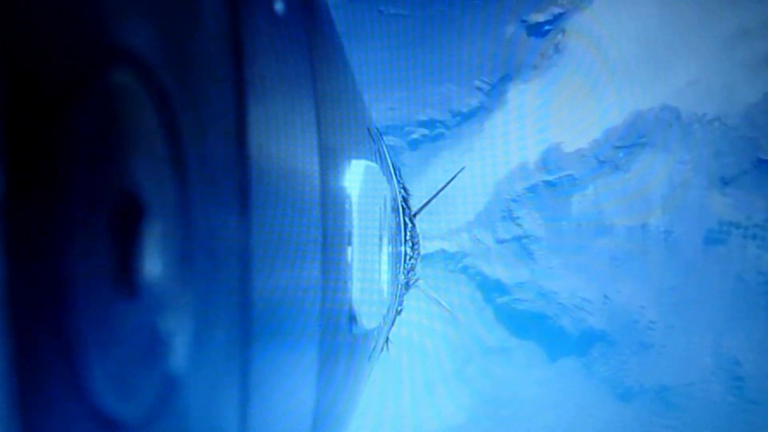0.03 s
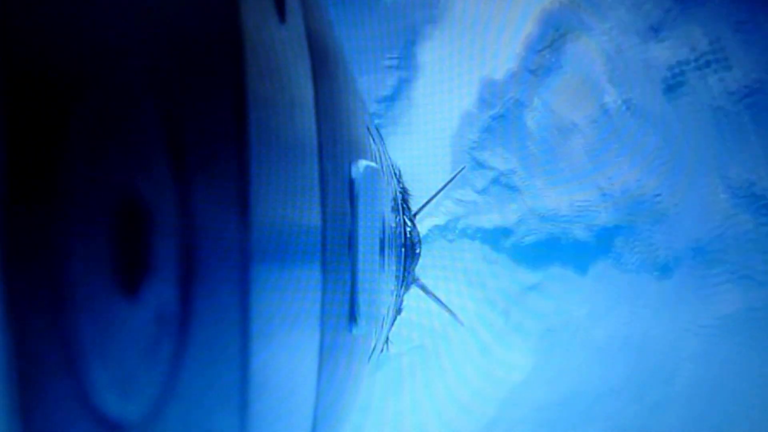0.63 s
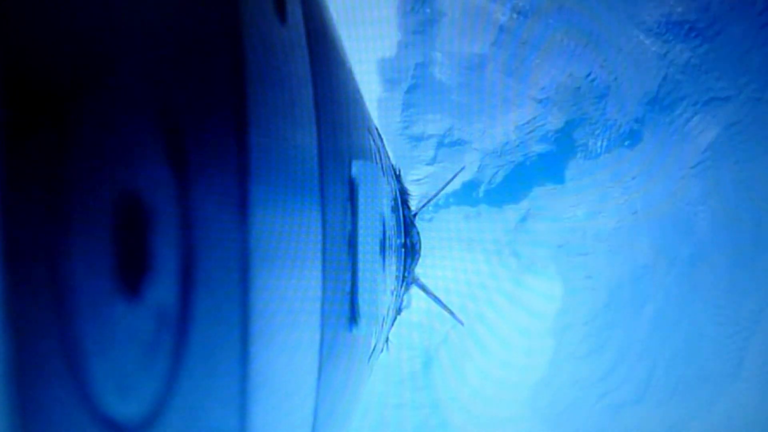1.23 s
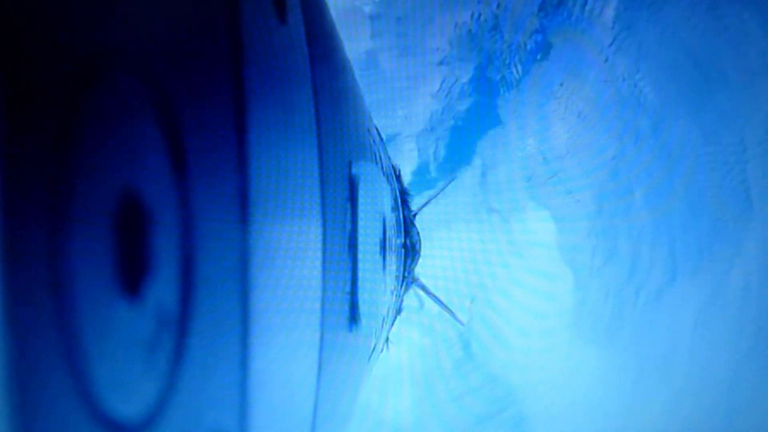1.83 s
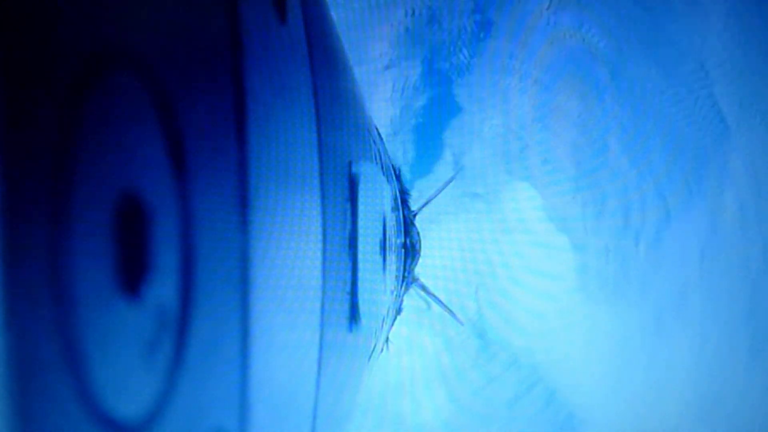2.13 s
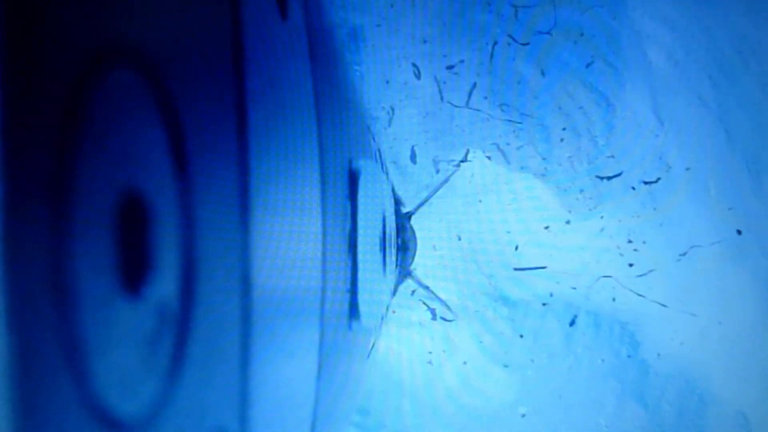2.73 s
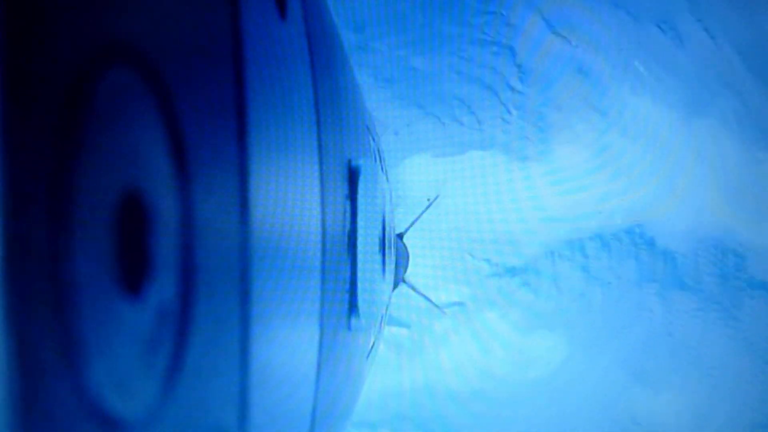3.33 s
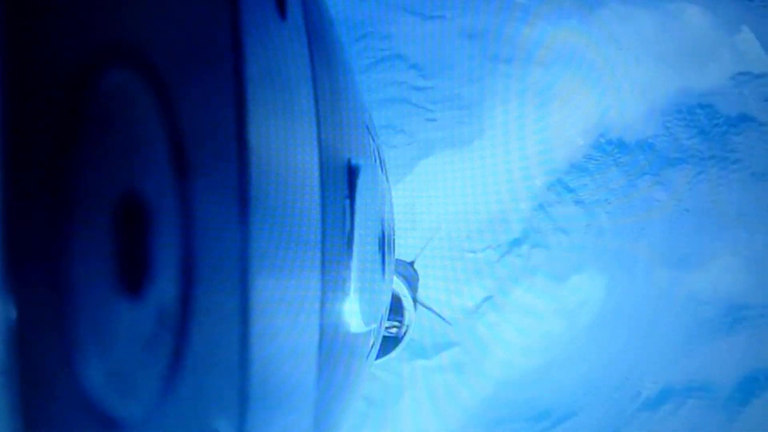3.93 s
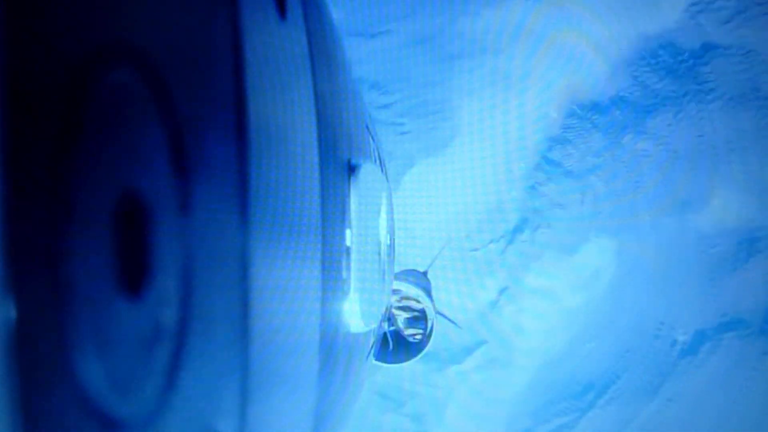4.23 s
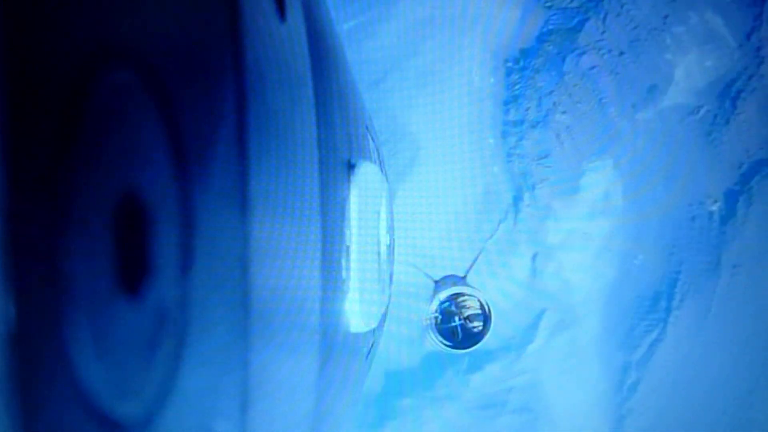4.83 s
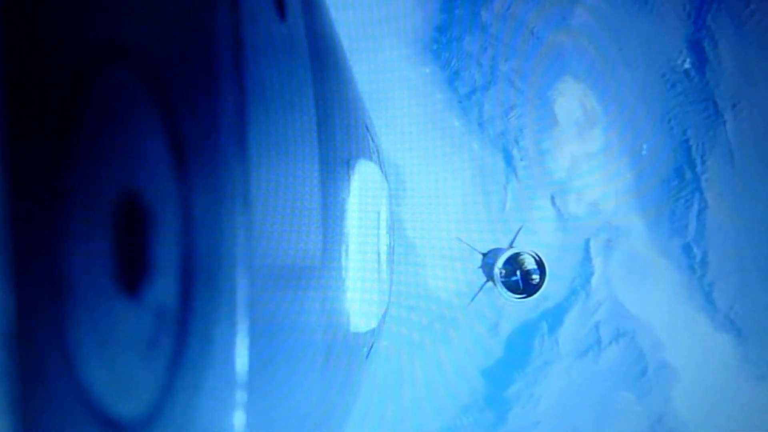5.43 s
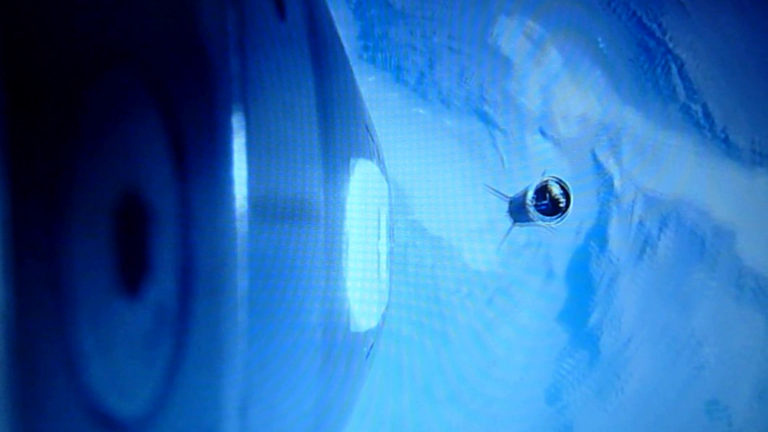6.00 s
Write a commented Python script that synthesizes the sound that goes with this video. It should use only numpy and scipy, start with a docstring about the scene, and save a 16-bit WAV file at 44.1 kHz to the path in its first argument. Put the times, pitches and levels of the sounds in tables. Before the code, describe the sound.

A coasting rocket hums and rattles softly until a clamp snaps open, parts clatter apart and a freed spring rings on one wavering note.

```python
"""A low rush fills the hull of a coasting rocket, with fits of rattling, soft knocks and faint swishes.
A clamp lets go with one sharp snap that shoves the hull, and the parts clatter as they slide apart.
A freed metal spring buzzes and swells into a ring that beats once and slowly dies away.
It is all heard, mono and dull, from a camera bolted to the hull."""
import sys
import numpy as np
from scipy import signal
from scipy.fft import rfft, irfft, next_fast_len
from scipy.io import wavfile
from scipy.ndimage import map_coordinates

SR = 44100
rng = np.random.default_rng(int(sys.argv[2]) if len(sys.argv) > 2 else 0)


def inscribe(sig):
    """Save sig as 16-bit PCM at rate SR to the path in sys.argv[1].

    A 1-D sig is mono; a 2-D sig holds one channel per row.
    Samples are clipped to [-1, 1] before scaling.
    """
    pcm = np.round(np.clip(np.atleast_2d(sig).T, -1, 1) * 32767)
    wavfile.write(sys.argv[1], SR, pcm.astype(np.int16))


N = 271788
TIME = np.arange(N) / SR
RELEASE_S = 2.5878  # the clamp lets go


def amp(db):
    """Decibels to gain."""
    return 10 ** (np.asarray(db) / 20)


def unit(x):
    """x at rms 1."""
    return x / np.sqrt(np.mean(x ** 2) + 1e-20)


def since(s):
    """Seconds since s, zero before."""
    return np.maximum(TIME - s, 0)


def bell(x, centre, width):
    """A bell curve of height 1."""
    return np.exp(-((x - centre) / width) ** 2 / 2)


def sine(hz, t):
    """A sine of random phase."""
    return np.sin(2 * np.pi * (hz * t + rng.random()))


def wobble(rate):
    """A smooth random curve, rate knots a second."""
    return map_coordinates(rng.standard_normal(int(N * rate / SR) + 4), [TIME * rate])


def filtered(x, response):
    """x through a complex frequency response."""
    size = next_fast_len(N + SR // 2)
    return irfft(rfft(x, size) * response(np.fft.rfftfreq(size, 1 / SR)), size)[:N]


def noise(response):
    """Fresh noise, shaped by a response, at rms 1."""
    return unit(filtered(rng.standard_normal(N), response))


def colour(points):
    """An EQ curve through (Hz, dB) points on a log axis."""
    hz, db = np.transpose(points)
    return lambda f: amp(np.interp(np.log(f + 1), np.log(hz + 1), db))


def body(modes):
    """The causal response of (Hz, width Hz, dB) resonances of alternating polarity."""
    return lambda f: sum((-1) ** k * amp(db) * 1j * f * width / (hz * hz - f * f + 1j * f * width)
                         for k, (hz, width, db) in enumerate(modes))


def impact(points, size=4096):
    """A minimum-phase pulse with a spectrum of (Hz, dB) points, at peak 1."""
    cepstrum = irfft(np.log(colour(points)(np.fft.rfftfreq(size, 1 / SR))))
    cepstrum[1:size // 2] *= 2  # folding packs the energy into the attack
    cepstrum[size // 2 + 1:] = 0
    pulse = irfft(np.exp(rfft(cepstrum)))[:size // 2]
    return pulse / np.abs(pulse).max()


def rush(level_db=-44):
    """A steady low rush in the hull, with a thin hiss on top."""
    # the tone of the rush: (frequency [Hz], relative level [dB])
    spectrum = [(20, -25.5), (90, -24), (115, -12.5), (160, -8), (185, 0), (230, -2.5), (300, -7.5),
                (410, -7), (480, -16.5), (620, -19.5), (820, -24), (1400, -25.5), (2600, -33.5),
                (5700, -41), (8000, -46.5)]
    return amp(level_db) * noise(colour(spectrum))


def rattle(gain_db=-1, edge_hz=900, simmer_db=-49, simmer_hz=700, simmer_swing_db=2):
    """Fits of fine contacts set the hull ringing; an uneven, dull simmer lasts until the release."""
    # fits of rattling: (time [s], relative level [dB])
    bursts = [(0.043, -36), (0.344, -39), (0.64, -52), (0.785, -42), (0.928, -40.5), (1.096, -40),
              (1.226, -46), (1.344, -41.5), (1.553, -45), (1.674, -48.5), (1.774, -41), (1.858, -38),
              (2.075, -41), (2.177, -44), (2.346, -34)]
    # the hull's resonances: (frequency [Hz], width [Hz], relative level [dB])
    hull_modes = [(276, 7.2, 1.5), (349, 20, 1.5), (382, 20, 2), (409, 10.8, 0.5), (455, 42, -7.5),
                  (562, 24.5, -5.5), (677, 12.6, 2.5), (790, 32, -6.5), (846, 20, -9.5)]
    attack_s, hold_s, fade_db_per_s = 0.0034, 0.029, 331.5

    def hull(cutoff_hz):
        """The hull's response, rolled off steeply above the cutoff."""
        return lambda f: body(hull_modes)(f) / (1 + (f / cutoff_hz) ** 12)

    force = sum(amp(db + gain_db - fade_db_per_s * since(s + hold_s))
                * (1 - np.exp(-since(s) / attack_s)) for s, db in bursts)
    contacts = rng.standard_normal(N)
    fits = filtered(force * contacts, hull(edge_hz)) / filtered(contacts, hull(edge_hz)).std()
    simmer = unit(noise(hull(simmer_hz)) * amp(simmer_swing_db * wobble(rate=14.07)))
    return fits + amp(simmer_db) * simmer * (TIME < RELEASE_S)


def knocks(gain_db=-2, rise_s=0.0073, rebound_s=0.037, rebound_loss_db=4):
    """Each dull knock swells for a few cycles, dies quickly and rebounds once, more weakly."""
    # knocks in the hull: (time [s], relative peak [dB], pitch [Hz])
    hits = [(0.083, -21, 345), (0.376, -27, 365), (0.634, -33, 396), (0.957, -29, 365), (1.156, -33.5, 386),
            (1.234, -32, 370), (1.356, -34, 400), (1.55, -32.5, 373), (1.87, -30.5, 350),
            (1.918, -27.5, 368), (2.085, -29, 372), (2.184, -34, 401), (2.355, -18, 406), (2.656, -25, 342),
            (2.71, -17, 350)]
    out = np.zeros(N)
    t = np.arange(SR // 8) / SR
    envelope = (t / rise_s * np.exp(1 - t / rise_s)) ** 2
    for s, db, hz in hits:
        for at, level in (s, db), (s + rebound_s, db - rebound_loss_db):
            out[round(at * SR):][:len(t)] += amp(level + gain_db) * envelope * sine(hz, t)
    return out


def swishes(width_hz=450):
    """Short, narrow puffs of hiss."""
    # faint ticks and swishes: (time [s], level [dB], centre [Hz], half length [s])
    puffs = [(.84, -55, 1900, .004), (1.128, -56, 1800, 0.0093), (2.04, -48.5, 1300, 0.0048),
             (2.461, -57.5, 3850, .006), (5.53, -68, 6800, .015), (5.575, -64.5, 5670, .022),
             (5.865, -71, 6400, .03)]
    return sum(amp(db) * bell(TIME, s, half) * noise(lambda f: bell(f, hz, width_hz))
               for s, db, hz, half in puffs)


def snap(gain_db=-2, spray_db=-28, spray_t60=0.029, spray_hz=3500, ring_db=-42, ring_t60=.24):
    """The clamp cracks open, with a short spray of treble and a faint after-ring."""
    # hard contacts of the clamp: (time [s], relative peak [dB])
    contacts = [(2.585, -24), (2.5883, 2), (2.7608, -26.5)]
    # the tone of the crack: (frequency [Hz], relative level [dB])
    crack_spectrum = [(40, -11.5), (150, -4), (400, 4), (700, 5), (1000, -1), (1250, -7), (1450, -11.5),
                      (1650, -1), (1900, 1.5), (2250, -8.5), (2700, -24), (3000, -11.5), (3650, -32.5),
                      (4270, -15.5), (5100, -39.5), (8000, -45)]
    # the clamp's resonances: (frequency [Hz], width [Hz], relative level [dB])
    clamp_modes = [(840, 36, 1.5), (1500, 54, -3), (1840, 25, -4.5), (2030, 11, 4), (2130, 68, -6),
                   (2960, 88, -17), (4200, 170, -15.5)]
    blows = np.zeros(N)
    for s, db in contacts:
        blows[round(s * SR)] = amp(db + gain_db)
    crack = signal.fftconvolve(blows, impact(crack_spectrum))[:N]
    t = since(RELEASE_S)
    spray = amp(spray_db - 60 * t / spray_t60) * noise(lambda f: 1 / (1 + (f / spray_hz) ** 2))
    ring = amp(ring_db - 60 * t / ring_t60) * noise(body(clamp_modes))
    return crack + (t > 0) * (spray + ring)


def shove(level_db=-11.0, hz=290, cycles=3.75, stop_s=0.00066):
    """The release shoves the hull for a few even cycles."""
    t = since(RELEASE_S)
    gate = (1 - np.tanh((t - cycles / hz) / stop_s)) / 2
    return -amp(level_db) * gate * np.sin(2 * np.pi * hz * t)


def slide(level_db=-35, bind_db=8, bind_at_s=2.73, bind_s=0.038, hold_s=.2, fade_db_per_s=130):
    """The parts chatter apart, hardest where they bind as the spring comes free, then lose touch."""
    # the tone of the scrape: (frequency [Hz], relative level [dB])
    spectrum = [(60, -41.5), (135, -29), (182, 1.5), (320, 1), (450, -1), (540, -22.5), (800, -26.5),
                (1400, -36), (2500, -52), (8000, -72.5)]
    chatter_db = 2.0
    scrape = unit(noise(colour(spectrum)) * amp(chatter_db * wobble(rate=90)))
    db = level_db + bind_db * bell(TIME, bind_at_s, bind_s) - fade_db_per_s * since(RELEASE_S + hold_s)
    return (TIME > RELEASE_S) * amp(db) * scrape


def shimmer(level_db=-51, start_s=2.698, attack_s=.006, fade_db_per_s=32, centre_hz=1320, width_hz=260):
    """As the spring scrapes free, its crowded upper modes buzz and die away."""
    t = since(start_s)
    envelope = amp(level_db - fade_db_per_s * t) * (1 - np.exp(-t / attack_s))
    resonance = body([(centre_hz, width_hz, 0)])
    return envelope * noise(lambda f: resonance(f) ** 2)


def spring(freed_s=2.72, note_hz=428.4, note_db=-14.4):
    """The freed spring sings one strong note that beats once; weaker modes fade at their own speeds."""
    # the spring's weaker modes: (frequency [Hz], level [dB], t60 [s], swell time [s])
    weak_modes = [(429.4, -42.5, 15, .5), (511.4, -53, 2, .15), (573.5, -50.5, 9.5, .2),
                  (592, -45, 6.3, .15), (861.3, -55, 1.5, .1), (1157, -56, 2.5, .15),
                  (1207.8, -41.5, 4.9, .18), (1276, -58, 1.5, .1), (1380.9, -34.5, 1.05, .17),
                  (1685, -62, 1.5, .1), (1906, -65, 1.5, .1)]
    swell_at_s, rise_s, hold_s, fade_db_per_s2 = 2.762, .03, .3, 12.6
    beat_at_s, close_s, open_s = 3.07, .077, .17
    dip_db, sag_hz = 11.2, 2.3  # level and pitch sag together in the beat
    half_width = np.where(TIME < beat_at_s, close_s, open_s)
    trough = 1 / (1 + ((TIME - beat_at_s) / half_width) ** 2)
    swell = (1 + np.tanh((TIME - swell_at_s) / rise_s / 2)) / 2
    level_db = note_db - dip_db * trough - fade_db_per_s2 * since(swell_at_s + hold_s) ** 2
    phase = 2 * np.pi * np.cumsum(note_hz - sag_hz * trough) / SR
    note = swell * amp(level_db) * np.sin(phase)
    t = since(freed_s)
    modes = sum(amp(db - 60 * t / t60) * (1 - np.exp(-(t / rise) ** 2)) * sine(hz, t)
                for hz, db, t60, rise in weak_modes)
    return np.sqrt(2) * (note + modes)  # the levels are rms


def scene():
    """Hull, clamp and spring, mixed to one channel."""
    mix = rush() + rattle() + knocks() + swishes() + snap() + shove() + slide() + shimmer() + spring()
    return mix[None]


def record(dry):
    """The camera cuts off the high treble and adds a slight DC offset."""
    top_hz, offset = 8000, .014
    return offset + np.array([filtered(x, lambda f: 1 / np.sqrt(1 + (f / top_hz) ** 60)) for x in dry])


dry = scene()
out = record(dry)
inscribe(out)
```